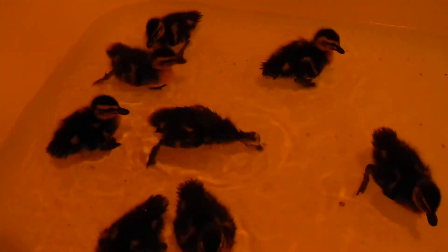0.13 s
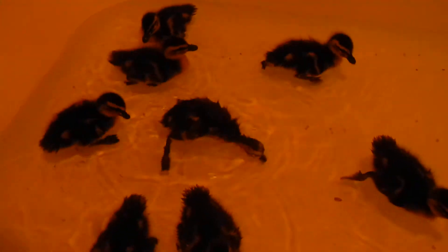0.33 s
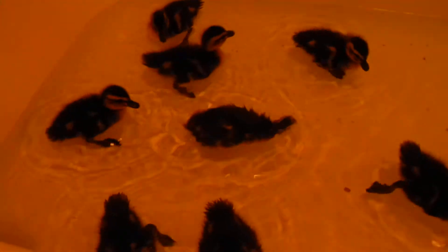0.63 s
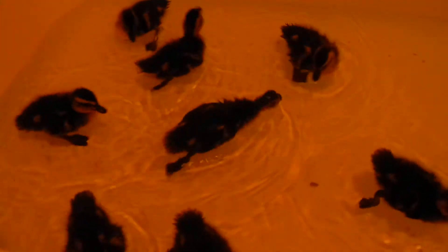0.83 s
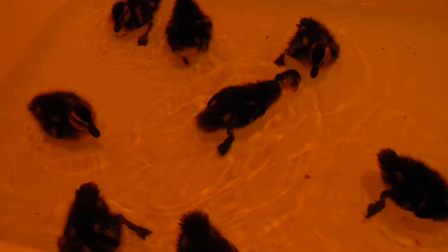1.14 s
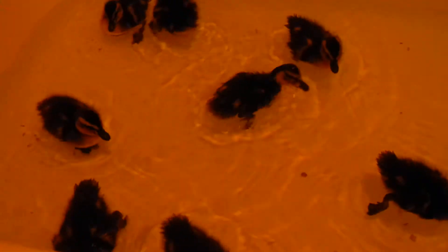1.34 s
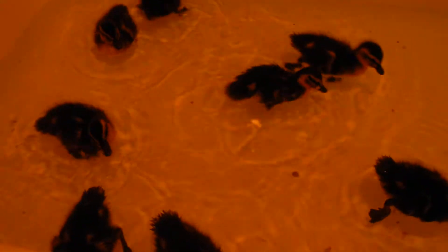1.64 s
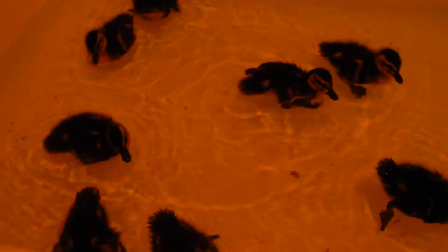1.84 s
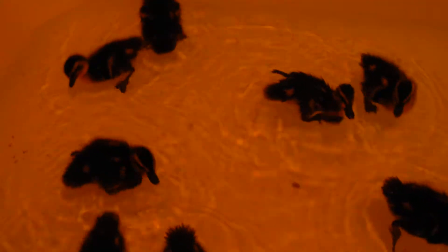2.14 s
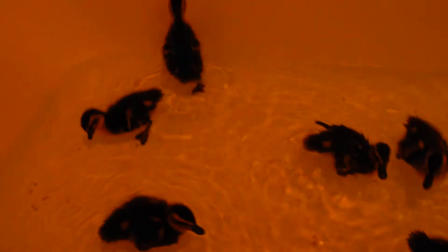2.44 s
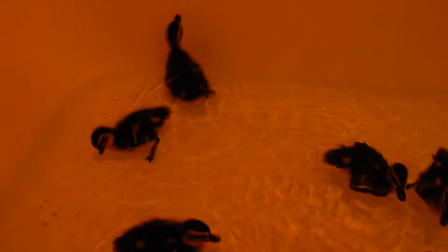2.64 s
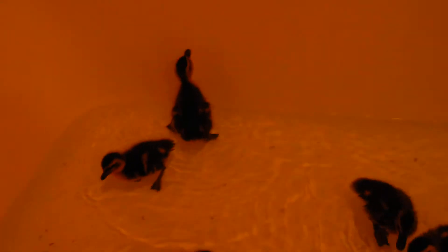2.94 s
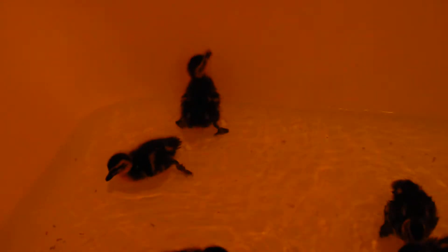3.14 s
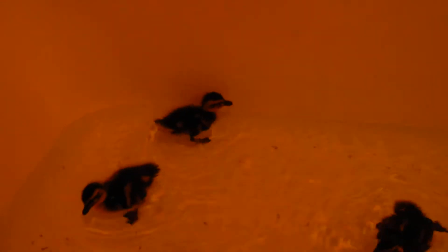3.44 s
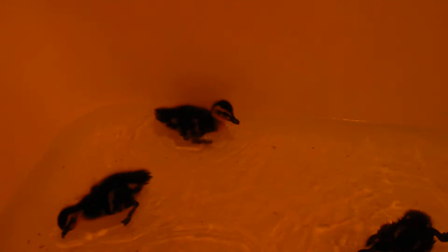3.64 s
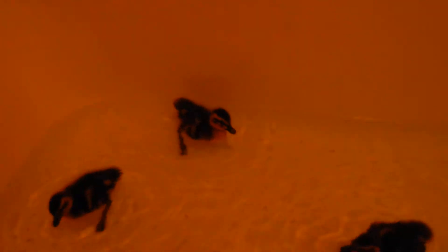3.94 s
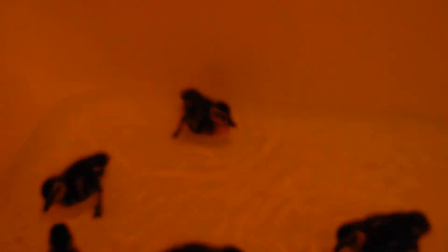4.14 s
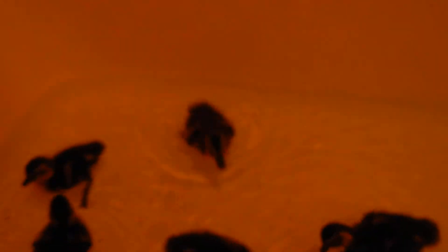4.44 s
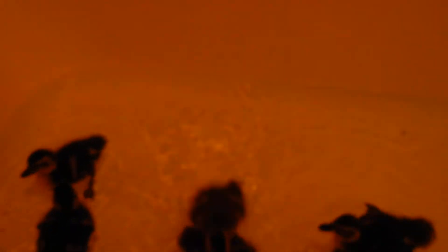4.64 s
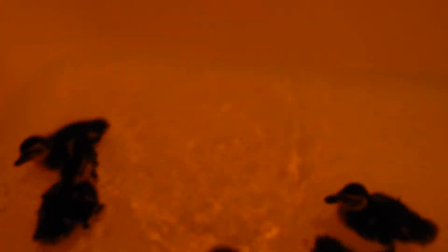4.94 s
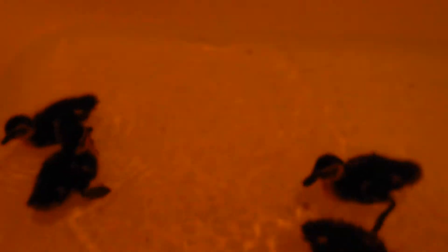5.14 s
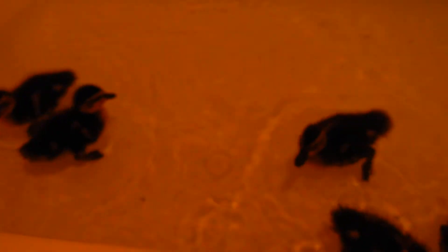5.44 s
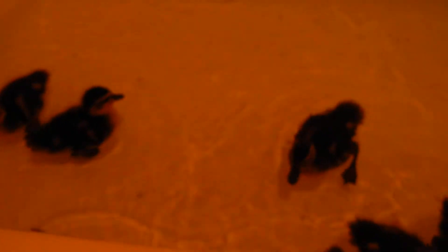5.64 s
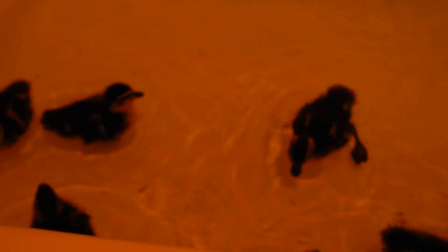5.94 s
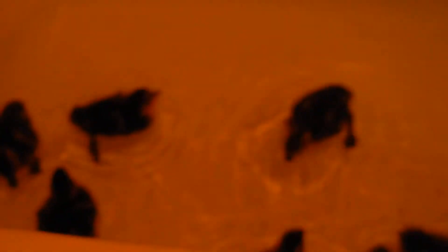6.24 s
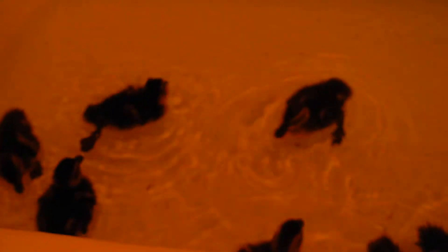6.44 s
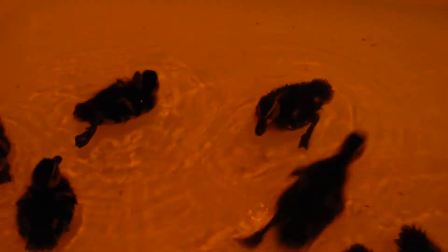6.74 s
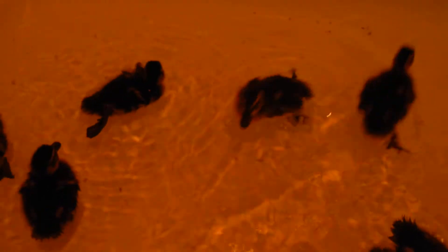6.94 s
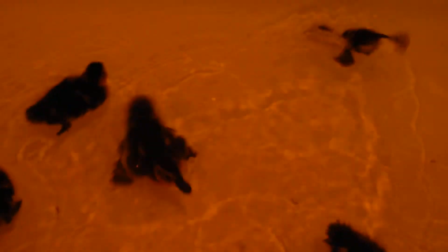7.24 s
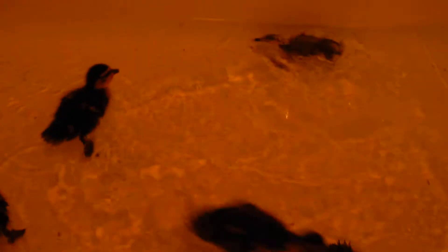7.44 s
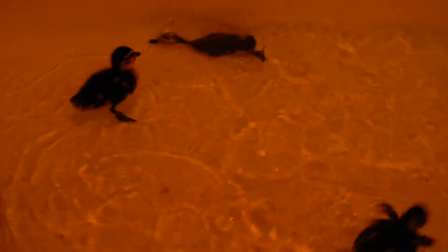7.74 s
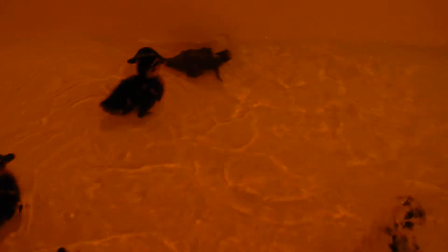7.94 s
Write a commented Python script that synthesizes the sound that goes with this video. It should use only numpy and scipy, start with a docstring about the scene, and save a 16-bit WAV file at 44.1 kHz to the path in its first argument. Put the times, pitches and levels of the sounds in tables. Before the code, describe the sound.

Ducklings paddle gently in a shallow bathtub, with a brief hard-walled echo and a low electrical hum underneath. Two faint, thin peeps sound in the first second, with a small water slap at about 0.6 seconds. From 1 to 3.8 seconds come scattered splashes, flicked drops, bubble plinks and soft thuds of feet against the tub. At 3.8 seconds a camera clicks close to the microphone and its focus motor hisses softly for over half a second. Three more faint peeps fall between 4.5 and 5.3 seconds among plinks, with a stronger bump and slosh at 5.2. The camera clicks and hisses again around 6.1 seconds. From about 6.7 seconds one duckling dashes across, churning the water into dense bubbling, plops and spray, loudest around 7.3 to 7.7 and continuing to the end, just after 8 seconds.

```python
"""Ducklings paddle in a shallow bath: trapped bubbles plink, feet slap the water and bump the tub,
bills flick drops, and a few thin, arching peeps sound. Near the end one bird dashes across and
churns the water. The tub and a small hard room ring briefly over a low mains hum. A camera clicks,
its focus motor hisses twice, and the low background sinks now and then."""
import sys
import numpy as np
from scipy import signal
from scipy.fft import rfft, irfft, next_fast_len
from scipy.io import wavfile
from scipy.ndimage import map_coordinates

SR = 44100
rng = np.random.default_rng(int(sys.argv[2]) if len(sys.argv) > 2 else 0)


def int16_out(signal):
    """Quantize to a 16-bit WAV file."""
    q = np.round(np.clip(np.atleast_2d(signal).T, -1, 1) * 32767)
    wavfile.write(sys.argv[1], SR, q.astype(np.int16))


N = 357210

# tone of washing water and of fine spray: (frequency [Hz], level [dB])
WASH_TONE = [(280, -16), (520, -1.5), (900, -0.5), (2300, 5), (3200, 1.5), (4500, -54), (9000, -16.5),
             (16000, -19)]
SPRAY_TONE = [(1500, -31), (4000, 7.5), (6800, 5.5), (10000, 7.5), (15500, -3)]
# stereo width of the room and of the tub: (frequency [Hz], side level against the middle [dB])
ROOM_STEREO = [(30, -33), (110, -4.5), (200, -5), (400, -4.5), (1000, -0.5), (4000, -2.5), (15000, 3)]
TUB_STEREO = [(100, -10.5), (400, -17), (2400, -16.5), (3800, -11), (5500, -5.5), (15000, -3.5)]


def amp(db):
    """Turn decibels into a gain."""
    return 10 ** (np.asarray(db) / 20)


def unit(x):
    """Scale a signal to an average (rms) level of 1."""
    return x / np.sqrt(np.mean(x ** 2) + 1e-20)


def along(points, hz):
    """Read between (frequency, value) points on a log frequency axis."""
    freqs, values = np.transpose(points)
    return np.interp(np.log(hz + 1), np.log(freqs + 1), values)


def wobble(rate):
    """A smooth curve through `rate` random points a second."""
    return map_coordinates(rng.standard_normal(int(N * rate / SR) + 4), [np.arange(N) * rate / SR])


def grainy(size, rate, depth_db):
    """A fast random gain: water breaks up in separate spits."""
    points = rng.standard_normal(int(size * rate / SR) + 2)
    return unit(amp(depth_db * np.interp(np.arange(size) * rate / SR, np.arange(len(points)), points)))


def filtered(x, response):
    """Scale each frequency of x by response(hz)."""
    n = x.shape[-1]
    padded = next_fast_len(n + SR // 5)
    return irfft(rfft(x, padded) * response(np.fft.rfftfreq(padded, 1 / SR)), padded)[..., :n]


def diffuse(pair, width):
    """Make stereo from two unrelated signals: one is the middle, the other spreads to the sides."""
    side = filtered(pair[1], lambda hz: amp(along(width, hz)))
    return np.array([pair[0] + side, pair[0] - side])


def noise(tone, size, width=TUB_STEREO):
    """Stereo noise with the given tone, at an average level of 1."""
    shaped = filtered(rng.standard_normal((2, size)), lambda hz: amp(along(tone, hz)))
    return unit(diffuse(shaped, width))


def add(track, start, sound):
    """Mix a sound into a stereo track, `start` seconds in."""
    part = track[:, max(round(start * SR), 0):][:, :sound.shape[-1]]
    part += sound[..., :part.shape[1]]


def fade(t, t60, attack):
    """A quick rise to 1, then a fall; the fade time t60 is the seconds it takes to drop 60 dB."""
    shape = (1 - np.exp(-t / attack)) * amp(-60 * t / np.maximum(t60, .001))
    return shape / shape.max(axis=-1, keepdims=True)


def held(start, length, attack, fall_db_per_s):
    """A gain that rises to 1, holds, and falls once `length` seconds have passed."""
    t = np.arange(N) / SR - start
    return np.clip(t / attack, 0, 1) * amp(-fall_db_per_s * np.maximum(t - length, 0))


def background(fizz):
    """Mains hum, rumble, ripples, lapping and a hiss that follows the spray; some sink in the lulls."""
    # tones of the hum: (frequency [Hz], level [dB])
    hum_tones = [(120, -0.5), (240.2, -14.5)]
    # tone of each noise: (frequency [Hz], level [dB])
    rumble_tone = [(20, -38), (45, -22), (70, -9.5), (100, -1), (130, -4), (165, -20.5), (200, -21),
                   (320, -37), (430, -18), (700, -23.5), (2000, -26), (8000, -77)]
    lapping_tone = [(120, -5.5), (220, -2), (400, -1.5), (600, -11), (1000, -14.5), (3000, -23.5)]
    hiss_tone = [(500, 1), (2000, 3.5), (3500, 14.5), (5000, 7), (7000, 6.5), (10000, 2), (13000, -27),
                 (16000, 10)]
    # quiet spells: (time [s], length [s], lapping drop [dB], hum drop [dB])
    lulls = [(3.87, 0.5, 35, 9), (4.445, 0.56, 11, 3.5), (6.104, 0.44, 16, 3), (7.607, 0.41, 16, 0)]
    t = np.arange(N) / SR
    lap_drop_db, hum_drop_db = sum(np.outer(drops, held(start, length, attack=0.3, fall_db_per_s=75))
                                   for start, length, *drops in lulls)
    hum = np.zeros(N)
    for hz, db in hum_tones:
        gain = amp(-48 - hum_drop_db + db + 0.33 * wobble(2.98))
        hum += gain * np.sqrt(2) * np.sin(2 * np.pi * hz * t + 0.04 * wobble(2))
    ripples = amp(-54.5 - 0.21 * lap_drop_db + 1.2 * wobble(12)) * noise(WASH_TONE, N, ROOM_STEREO)
    lapping = amp(-53.5 - lap_drop_db + 2.77 * wobble(9)) * noise(lapping_tone, N, ROOM_STEREO)
    rumble = amp(-50.5) * noise(rumble_tone, N, ROOM_STEREO)
    hiss = fizz * amp(2 + 1.3 * wobble(21)) * noise(hiss_tone, N, ROOM_STEREO)
    return hum + rumble + ripples + lapping + hiss


def focus_motor():
    """The camera's focus motor starts with a bright puff and a whirr, then hisses softly as it runs."""
    # motor runs: (time [s], length [s], hiss [dB], puff [dB], whirr [dB])
    runs = [(3.821, 0.67, -45, -46, -51), (6.06, .66, -45, -41, -40)]
    # tone of each part: (frequency [Hz], level [dB])
    hiss_tone = [(1200, 2.5), (2500, 6), (3700, 9), (5000, 2), (6700, 6), (9000, -3), (15000, -12)]
    puff_tone = [(1500, -30), (4000, 3), (6800, 13), (10000, -5), (14000, 10), (16000, -2)]
    whirr_tone = [(2000, -14), (3300, -1), (3950, -4), (4700, -23)]
    out, spin_up_s = np.zeros((2, N)), 0.061
    for start, length, hiss_db, puff_db, whirr_db in runs:
        t = np.arange(int(length * SR)) / SR
        gate = np.clip(np.minimum(t, length - t) / 0.0092, 0, 1)
        hiss = amp(hiss_db - 13.7 * t) * noise(hiss_tone, len(t), ROOM_STEREO)
        puff = amp(puff_db - 60 * t / 0.48) * noise(puff_tone, len(t), ROOM_STEREO)
        whirr = amp(whirr_db - 250 * np.maximum(t - spin_up_s, 0)) * noise(whirr_tone, len(t))
        add(out, start, gate * (hiss + puff + whirr))
    return out


def camera_clicks():
    """Each click is a tiny crack and a short ring of the camera's body."""
    # clicks: (time [s], level [dB], brightest pitch [Hz])
    clicks = [(3.821, -23.5, 1640), (6.08, -20, 2700), (6.0904, -21.5, 6400), (6.095, -24, 4200),
              (6.1696, -28.5, 3420), (6.1775, -30, 2400), (7.177, -24.5, 826)]
    # notes of the body: (pitch [Hz], level [dB], fade time [s])
    body_notes = [(757, 3.5, 0.027), (1850, 6.5, 0.0055), (2820, 2, 0.0065), (3780, -4, 0.016),
                  (6690, -0.5, 0.0043)]
    out, t = np.zeros((2, N)), np.arange(SR // 20) / SR
    for start, db, bright_hz in clicks:
        ring = np.zeros(len(t))
        for hz, note_db, t60 in body_notes:
            octaves_away = abs(np.log2(hz / bright_hz))
            ring += amp(note_db - 7 * octaves_away) * np.sin(2 * np.pi * hz * t) * fade(t, t60, 0.00044)
        crack_tone = [(bright_hz / 4, -15), (bright_hz, 0), (4 * bright_hz, -16)]
        crack = noise(crack_tone, len(t)) * fade(t, 0.0077, 0.00015)
        add(out, start, amp(db) * (amp(3) * ring / np.abs(ring).max() + amp(-13) * crack))
    return out


def room_tail():
    """The echo of the hard walls after a click at one spot."""
    # how long the room rings: (frequency [Hz], fade time [s])
    fade_times = [(100, 0.76), (300, 0.3), (600, 0.2), (1500, 0.28), (4000, 0.19), (12000, 0.34)]
    hz, t, spectrum = signal.stft(rng.standard_normal((2, SR // 3)), SR, nperseg=256)
    tail = signal.istft(spectrum * amp(-60 * t / along(fade_times, hz)[:, None]), SR, nperseg=256)[1]
    stereo = diffuse(tail / np.linalg.norm(tail[0]), TUB_STEREO)
    return np.pad(stereo, ((0, 0), (SR // 500, 0)))  # arrives 2 ms late


def bathroom(x, echo_db, spots=20):
    """Hard walls answer at once, with a new echo for each spot the birds swim to."""
    echo = np.zeros((2, N))
    for part in np.array_split(np.arange(N), spots):
        add(echo, part[0] / SR, signal.fftconvolve(x.mean(0)[None, part], room_tail(), axes=1))
    return x + amp(echo_db) * echo


def hollow_tub(x, ring_db):
    """The air between the tub's walls rings on at its own pitches."""
    # notes of that air: (pitch [Hz], level [dB], fade time [s])
    air_notes = [(445, 16, 0.16), (757, 26, 0.045), (940, 31, 0.03), (1280, 6, 0.46), (2000, 28, 0.03),
                 (2230, 25, 0.22), (2530, 8, 0.11)]
    t = np.arange(SR // 3) / SR
    ring = sum(amp(db - 60 * t / t60) * np.sin(2 * np.pi * hz * t) for hz, db, t60 in air_notes)
    return x + amp(ring_db) * signal.fftconvolve(x, ring[None] / np.linalg.norm(ring), axes=1)[:, :N]


def peeps():
    """A duckling's thin whistle leaps up and falls; a bird facing away is heard mostly off the walls."""
    # peeps: (time [s], length [s], top pitch [Hz], level [dB], echo against direct sound [dB])
    calls = [(.030, .05, 4060, -48, -4), (.652, .067, 3870, -46, 0), (4.555, .046, 3200, -41, 2),
             (5.020, .064, 3520, -44, 3), (5.204, .054, 3820, -39, 4)]
    out = np.zeros((2, N))
    arch_depth, crest, roundness = .38, .46, 2.5
    for start, length, top_hz, db, echo_db in calls:
        progress = np.linspace(0, 1, int(length * SR))
        pitch = top_hz * (1 - arch_depth * np.abs(2 * (progress - crest)) ** roundness)
        phase = 2 * np.pi * np.cumsum(pitch) / SR
        swell = np.abs(np.sin(np.pi * progress)) ** .2
        call = amp(db) * swell * (np.sin(phase) + amp(-32) * np.sin(2 * phase))
        add(out, start, call)
        add(out, start, amp(echo_db) * signal.fftconvolve(call[None], room_tail(), axes=1))
    return out


def tub_bumps():
    """A kick thuds on the tub and rings its wall; the water heaves just before and sloshes after."""
    # kicks: (time [s], level [dB], wall pitch [Hz], slosh [dB], thud fade time [s])
    kicks = [(1.185, -27.5, 457, -30, 0.089), (1.364, -30.5, 110.6, -41, 0.17),
             (1.651, -30, 397.5, -39, 0.097), (1.675, -28, 399, -40, 0.065),
             (1.677, -28.5, 153, -52, 0.063), (1.689, -29, 274, -44, 0.063), (1.808, -29.5, 114, -42, 0.12),
             (2.524, -20, 283, -31, 0.098), (2.53, -24.5, 421, -48, .1), (2.554, -32, 107, -51, 0.12),
             (3.093, -27, 115.6, -49.5, 0.21), (3.12, -28.5, 420, -38, 0.043),
             (5.152, -15, 460, -23, 0.047), (5.165, -26.5, 117, -34, 0.22), (5.829, -28.5, 224, -43, 0.065),
             (5.838, -26, 97, -57, 0.13), (6.188, -25.5, 420, -26.5, 0.1), (6.207, -27, 115, -31.5, 0.1),
             (6.455, -35.5, 98, -39.5, 0.18), (6.964, -28, 248, -27.5, 0.077),
             (7.722, -28, 93.5, -34, 0.16)]
    # tone of the wall's thud and of the slosh: (frequency [Hz], level [dB])
    thud_tone = [(20, -44), (45, -31), (100, 5.5), (180, -2.5), (300, -9.5), (420, 2.5), (560, -25.5),
                 (900, -59), (2500, -38.5)]
    slosh_tone = [(200, -8), (500, 12), (800, 12), (1400, 3), (2100, 0.5), (3200, -6), (5000, -30),
                  (10000, -47)]
    out, t, lead = np.zeros((2, N)), np.arange(SR // 3) / SR, SR // 30
    for start, db, hz, slosh_db, t60 in kicks:
        thud = noise(thud_tone, len(t)) * fade(t, t60, 0.0074)
        ring = np.sin(2 * np.pi * hz * t) * fade(t, 1.23 * t60, 0.0055)
        add(out, start, amp(db - 13.5) * thud + amp(db - 8.5) * ring)
        heave = np.concatenate([0.16 * np.linspace(0, 1, lead), fade(t, 1.8 * t60, 0.00023)])
        add(out, start - lead / SR, amp(slosh_db - 4.5) * noise(slosh_tone, len(heave)) * heave)
    return filtered(out, lambda hz: 1j * hz / (59.6 + 1j * hz))  # the tub gives off little deep bass


def bubble(t, hz, t60, rise, attack_cycles):
    """A trapped air pocket rings, its pitch rising as it nears the surface."""
    pitch = hz * (1 + rise * np.minimum(t / t60, 1))
    return np.sin(2 * np.pi * np.cumsum(pitch, axis=-1) / SR) * fade(t, t60, attack_cycles / hz)


def scatter(rings, when, size):
    """Mix many rings into `size` samples, each starting at its fraction `when` of the way."""
    places = (when * size).astype(int) + np.arange(rings.shape[-1])
    return unit(np.bincount(places.ravel(), rings.ravel(), size)[:size])


def swarm(per_s, low_hz, high_hz, cycles, spread_db):
    """A steady swarm of bubbles of random pitch, life and loudness."""
    when, tone, life, strength = rng.random((int(per_s * N / SR), 4)).T[:, :, None]
    hz = low_hz * (high_hz / low_hz) ** tone
    rings = bubble(np.arange(SR // 25) / SR, hz, cycles * (.5 + life) / hz, rise=0.094, attack_cycles=.5)
    return scatter(amp(spread_db * strength ** 2) * rings, when, N)


def flicked_drops():
    """Flicked drops land with a splat and ring a tiny bubble, amid a patter of smaller ones."""
    # drops: (time [s], level [dB], pitch [Hz], bubble fade time [s])
    drops = [(1.623, -32, 10400, 0.0067), (1.66, -30.5, 7760, .008), (1.687, -33.5, 4130, 0.027),
             (1.913, -31, 7300, 0.0044), (1.998, -31, 5600, 0.0099), (2.060, -32.5, 10700, 0.0088),
             (2.141, -25.5, 8400, 0.016), (2.169, -30, 8600, 0.0092), (2.372, -30, 4980, 0.012),
             (2.457, -36, 6500, 0.03), (3.123, -32, 8900, .014), (3.194, -33.5, 6060, 0.019),
             (3.251, -33, 3970, 0.023), (3.557, -32.5, 6700, .03), (3.749, -32, 11500, 0.0046),
             (5.779, -33, 6960, 0.0074), (6.128, -24, 13000, .006), (6.227, -26, 6450, 0.007),
             (6.336, -31, 7840, 0.014), (7.295, -27.5, 10600, 0.0068), (7.512, -27.5, 8800, 0.052),
             (7.652, -23, 5560, 0.039), (7.937, -30, 5170, 0.014)]
    out, t, lead = np.zeros((2, N)), np.arange(SR // 20) / SR, SR // 40
    for start, db, hz, t60 in drops:
        patter = np.hanning(len(t)) * grainy(len(t), rate=930, depth_db=1)
        add(out, start - lead / SR, amp(db - 26) * noise(SPRAY_TONE, len(t)) * patter)
        tone = [(hz / 4, -28), (.7 * hz, -12), (.9 * hz, -1),
                (1.1 * hz, 0), (1.3 * hz, -8), (2 * hz, -14)]
        splat = amp(-9) * noise(tone, len(t)) * fade(t, t60, 0.00033)
        add(out, start, amp(db) * (splat + .13 * bubble(t, hz, t60, rise=.3, attack_cycles=3)))
    return out


def slaps():
    """A foot or bill swishes in and breaks the surface: a crack, a short wet burst and fine spray."""
    # hits on the water: (time [s], level [dB], spray [dB], burst fade time [s])
    hits = [(0.555, -23, -31, 0.041), (1.8158, -19, -61, 0.025), (2.142, -37, -53, 0.05),
            (3.251, -34, -52.5, 0.022), (3.601, -31, -49, 0.06), (3.612, -22.5, -33, 0.029),
            (3.839, -32, -57, 0.036), (4.525, -30, -52, 0.032), (5.367, -25.5, -37, 0.057),
            (7.177, -24, -34, 0.013), (7.606, -21, -61, 0.056), (7.649, -23, -61, 0.05)]
    # tone of a slap: (frequency [Hz], level [dB])
    slap_tone = [(150, -48), (450, 2.5), (800, 11.5), (1300, 4), (2100, 13), (3200, 8.5), (4500, -10.5),
                 (9000, -33)]
    out, t, lead = np.zeros((2, N)), np.arange(SR // 5) / SR, SR // 25
    swish = 0.36 * amp(-60 * t[:lead][::-1] / 0.042)
    crack = 1.68 * fade(t, 0.003, 0.000081)
    for start, db, spray_db, t60 in hits:
        burst = 0.5 * fade(t, t60, 0.0051) * grainy(len(t), rate=820, depth_db=3)
        shape = np.concatenate([swish, crack + burst])
        splash = amp(db - 6) * noise(slap_tone, len(shape))
        spray = amp(spray_db) * noise(SPRAY_TONE, len(shape))
        add(out, start - lead / SR, shape * (splash + spray))
    return out


def gulps():
    """A foot drags air under: the pocket tears into a short cloud of bubbles, all near one size."""
    # air pockets: (time [s], length [s], level [dB], middle pitch [Hz])
    pockets = [(2.391, .006, -50, 1890), (3.249, 0.0061, -40, 2030), (4.633, 0.061, -51, 1480),
               (4.656, 0.067, -49.5, 2450), (5.152, 0.01, -26.5, 1010), (6.763, 0.025, -31.5, 1980),
               (6.767, 0.047, -40.5, 990), (6.819, 0.029, -34.5, 944), (6.947, 0.026, -37, 1900),
               (7.003, 0.014, -31.5, 1200), (7.297, 0.0082, -33, 1820), (7.321, 0.032, -39.5, 2390),
               (7.395, 0.019, -28.5, 1290), (7.424, 0.025, -34, 980), (7.477, 0.021, -35, 2500),
               (7.605, 0.022, -39.5, 2250), (7.606, 0.052, -35, 767), (7.654, 0.024, -32, 1760),
               (7.697, 0.0084, -38, 2210), (7.698, 0.013, -31, 1340), (7.953, 0.017, -32.5, 1710),
               (7.998, 0.035, -33, 1930), (8.027, 0.027, -35.5, 1010)]
    out, t = np.zeros((2, N)), np.arange(SR // 6) / SR
    bubbles_per_s, cycles, spread_octaves, fall_db_per_s = 500, 13, .45, 709
    for start, length, db, hz in pockets:
        when, tone, strength = rng.random((int(bubbles_per_s * t[-1]), 3)).T[:, :, None]
        pitch = hz * 2 ** (spread_octaves * (2 * tone - 1))
        rings = bubble(t[:SR // 30], pitch, cycles / pitch, rise=0.056, attack_cycles=1)
        cloud = scatter(amp(12 * strength ** 2) * rings, when, len(t))
        wash_tone = [(hz / 2, -28), (.93 * hz, -4), (hz, 0),
                     (.97 * hz, -6), (2 * hz, -28), (5 * hz, -60)]
        wash = amp(-1.5) * noise(wash_tone, len(t))
        shape = np.minimum(t / 0.0025, 1) * amp(-fall_db_per_s * np.maximum(t - length, 0))
        add(out, start, amp(db) * shape * unit(cloud + wash))
    return out


def plinks():
    """Larger bubbles pinch off with a short wet spit; the violent ones ring for the fewest cycles."""
    # single bubbles: (time [s], level [dB], pitch [Hz])
    large_bubbles = [(1.735, -36, 2750), (2.127, -33, 2580), (2.393, -30, 1830), (2.617, -35.5, 2600),
                     (3.201, -43, 793), (3.250, -27.5, 1900), (3.261, -31, 1850), (4.054, -33.5, 2400),
                     (4.524, -29, 2340), (4.613, -34, 1760), (4.660, -40.5, 3350), (4.691, -38, 1400),
                     (4.712, -33, 2330), (4.727, -35, 2620), (4.765, -35, 1170), (4.824, -21, 2050),
                     (4.832, -21.5, 2160), (4.842, -36.5, 876), (5.155, -22, 469.5), (5.157, -22, 786),
                     (5.163, -29, 1340), (5.368, -21, 3220), (5.843, -43.5, 604), (6.056, -36, 1800),
                     (6.277, -29.5, 2120), (6.764, -20.5, 2300), (6.818, -15.5, 1310), (6.895, -19.5, 1875),
                     (7.005, -20, 1390), (7.066, -34.5, 745), (7.3176, -5, 2230), (7.324, -36, 644),
                     (7.397, -24, 1530), (7.398, -31, 700), (7.428, -20, 504), (7.444, -24, 1170),
                     (7.447, -25.5, 677), (7.484, -35, 493), (7.510, -25.5, 620), (7.512, -11.5, 2470),
                     (7.534, -26, 564), (7.553, -27.5, 599), (7.6065, -15.5, 1200), (7.649, -21, 1770),
                     (7.699, -14.5, 2080), (7.716, -23, 2070), (7.759, -24, 2260), (7.816, -32, 800),
                     (7.879, -26.5, 770), (7.888, -30.5, 760), (7.965, -21, 1790), (8.003, -19, 1940),
                     (8.014, -28, 630), (8.067, -24, 1000), (8.093, -28, 721)]
    out, t = np.zeros((2, N)), np.arange(SR // 5) / SR
    for start, db, hz in large_bubbles:
        cycles = np.clip(33.7 * .5 ** ((db + 25.5) / 14), 13, 35.7)  # halved by every 14 dB more
        t60 = cycles / hz
        ring = bubble(t, hz, t60, rise=0.022, attack_cycles=1.66)
        spit_tone = [(hz / 3, -28), (hz, 0), (1.42 * hz, -6), (2.3 * hz, -28), (5 * hz, -55)]
        spit = amp(-15.5) * noise(spit_tone, len(t)) * fade(t, t60, 0.0018)
        add(out, start, amp(db) * (ring + spit))
    return out


def stroke_gains():
    """Foot strokes stir up small bubbles, big bubbles and spray; the spray settles last."""
    # strokes: (time [s], length [s], small bubbles [dB], big bubbles [dB], spray [dB])
    strokes = [(1.304, 0.015, -41, -42, -63), (1.826, 0.27, -58.5, -69, -55),
               (3.538, 0.012, -47, -50.5, -49.5), (6.197, 0.18, -54, -61, -66),
               (6.712, 0.051, -40, -38, -52), (6.782, 0.085, -37, -49, -50.5),
               (6.925, 0.16, -37.5, -49, -70), (7.15, 0.17, -47.5, -69, -54), (7.325, 0.071, -35, -50, -54),
               (7.386, 0.04, -29.5, -31.5, -46.5), (7.493, 0.068, -32, -34, -49.5),
               (7.608, 0.11, -45, -43, -49.5), (7.743, 0.29, -43.5, -45.5, -47),
               (7.937, 0.048, -32, -43, -41), (8.037, 0.068, -34, -29.5, -55)]
    power = np.zeros((3, N))
    for start, length, small_db, big_db, spray_db in strokes:
        push = held(start, length, attack=0.0063, fall_db_per_s=125)
        mist = held(start, length, attack=0.0063, fall_db_per_s=70)
        power += np.square([amp(small_db) * push, amp(big_db) * push, amp(spray_db) * mist])
    return np.sqrt(power)


def paddling(small_gain, big_gain, drop_gain):
    """Gentle paddling keeps small bubbles and droplets going; each stroke whips up a dense swarm."""
    gentle = amp(-65.5) * swarm(per_s=260, low_hz=900, high_hz=3600, cycles=13, spread_db=13)
    small = amp(-5) * swarm(per_s=240, low_hz=950, high_hz=2800, cycles=21, spread_db=13)
    big = amp(-5.5) * swarm(per_s=120, low_hz=580, high_hz=845, cycles=11, spread_db=14)
    wash = amp(-8.5) * noise(WASH_TONE, N)
    drops = amp(-16) * swarm(per_s=110, low_hz=5500, high_hz=14400, cycles=14, spread_db=20)
    return gentle + small_gain * (small + wash) + big_gain * big + drop_gain * drops


def scene():
    """The water rings in the tub, then in the room; the camera is so close that it has no echo."""
    small_gain, big_gain, spray_gain = stroke_gains()
    fizz = np.hypot(amp(-55.5), spray_gain)  # a steady floor plus the spray
    water = plinks() + gulps() + slaps() + paddling(small_gain, big_gain, fizz + spray_gain)
    in_tub = hollow_tub(water + tub_bumps(), ring_db=-27)
    in_room = bathroom(in_tub + flicked_drops(), echo_db=-1)
    mix = in_room + peeps() + background(fizz) + focus_motor() + camera_clicks()
    return mix * amp([[.25], [-.25]])  # the left side is a touch louder


def record(dry):
    """Cut away the very highest treble."""
    return filtered(dry, lambda hz: hz < 15900)


dry = scene()
out = record(dry)
int16_out(out)
```